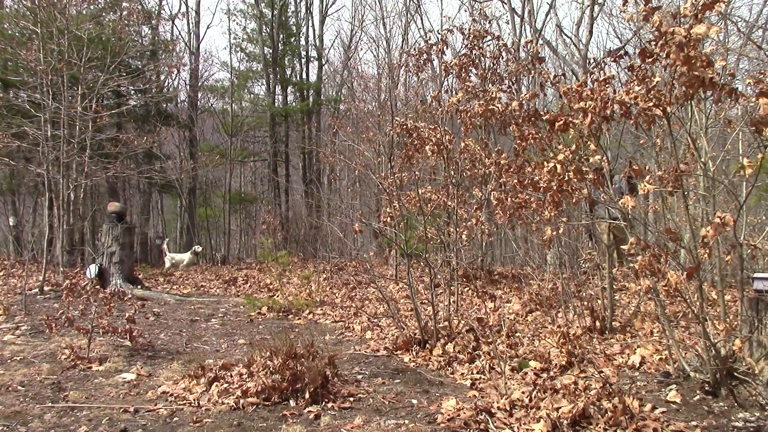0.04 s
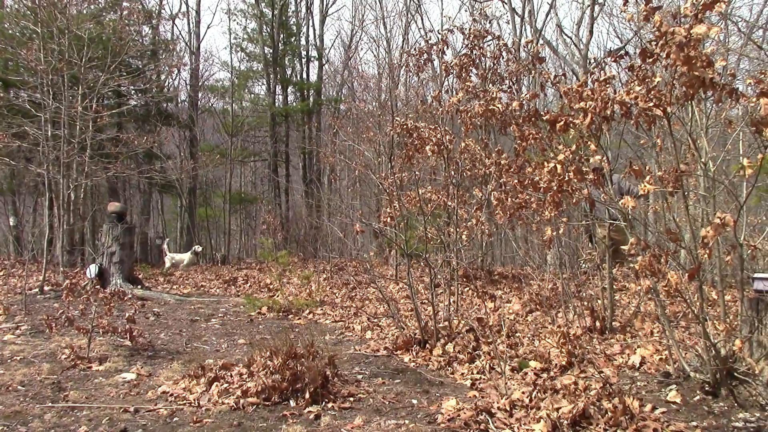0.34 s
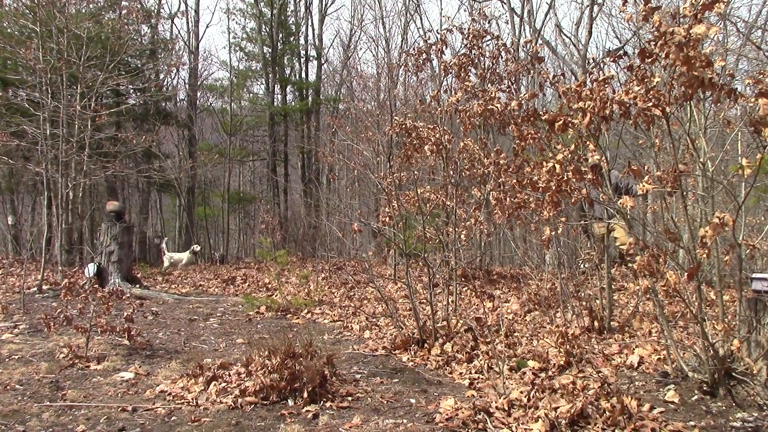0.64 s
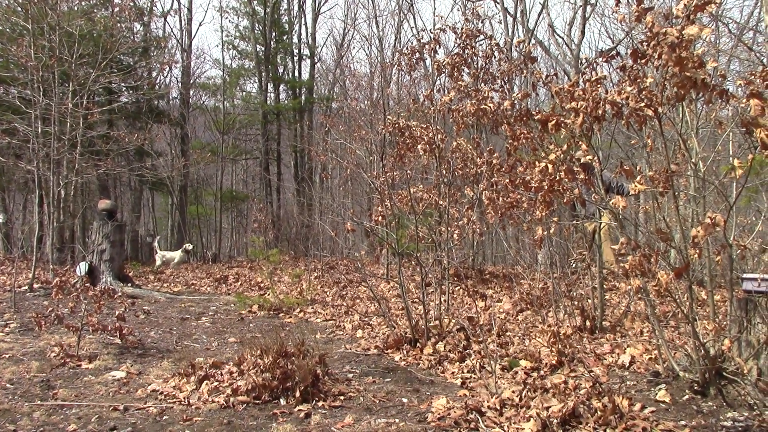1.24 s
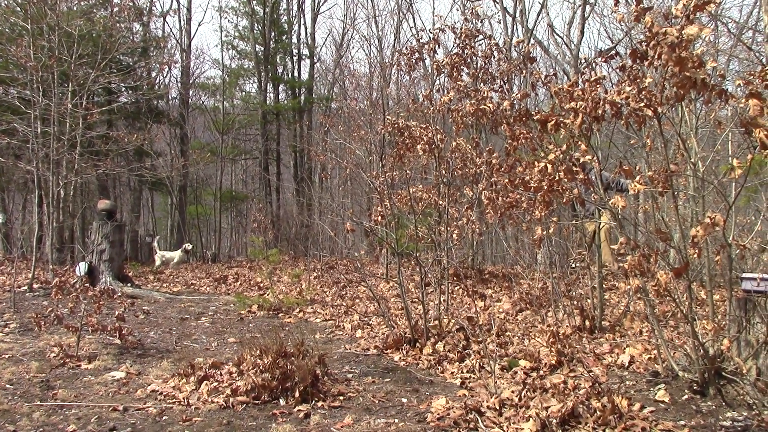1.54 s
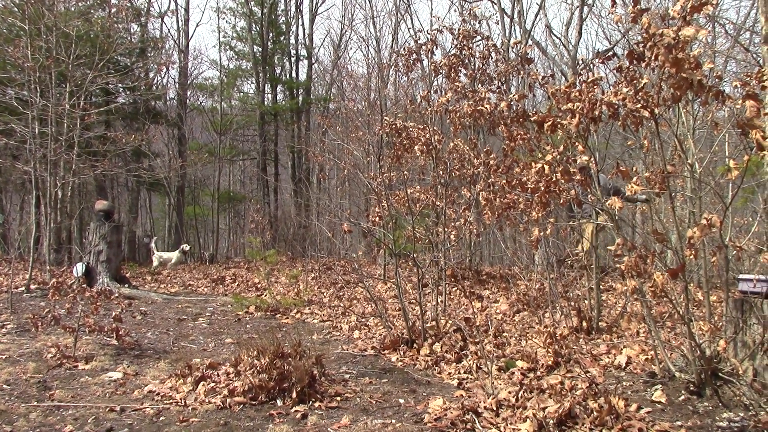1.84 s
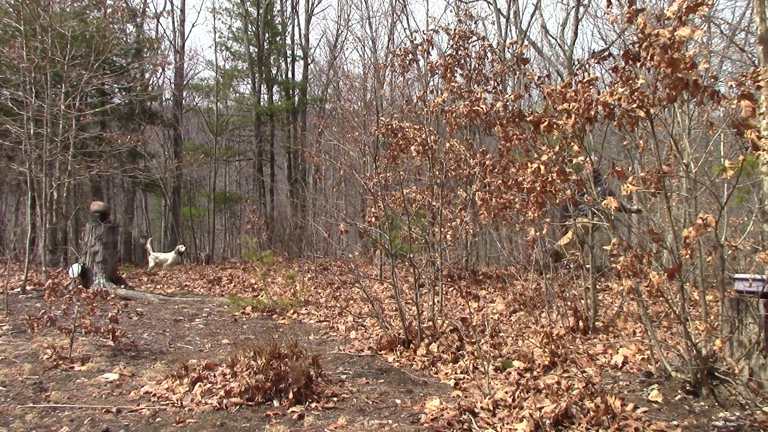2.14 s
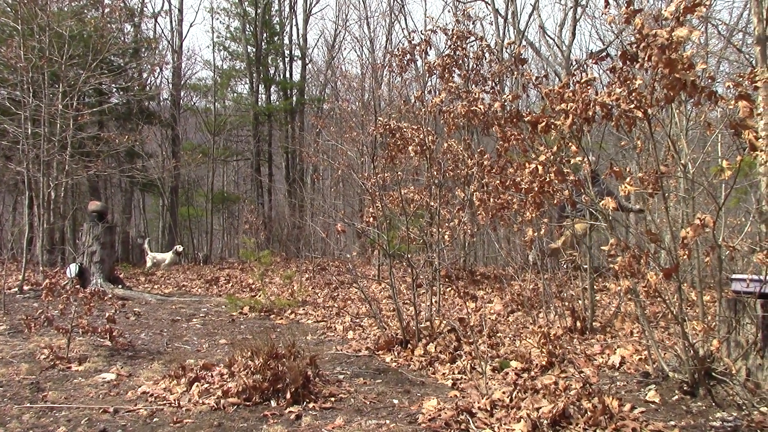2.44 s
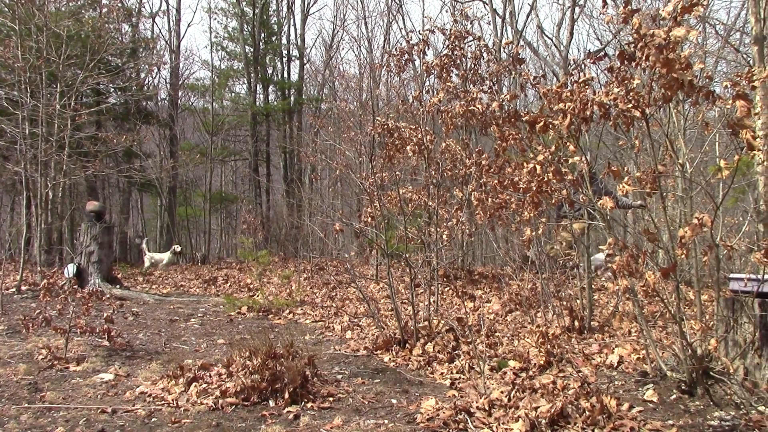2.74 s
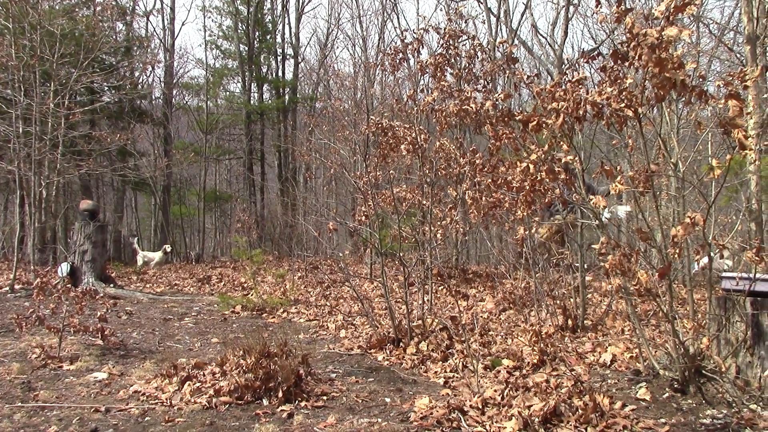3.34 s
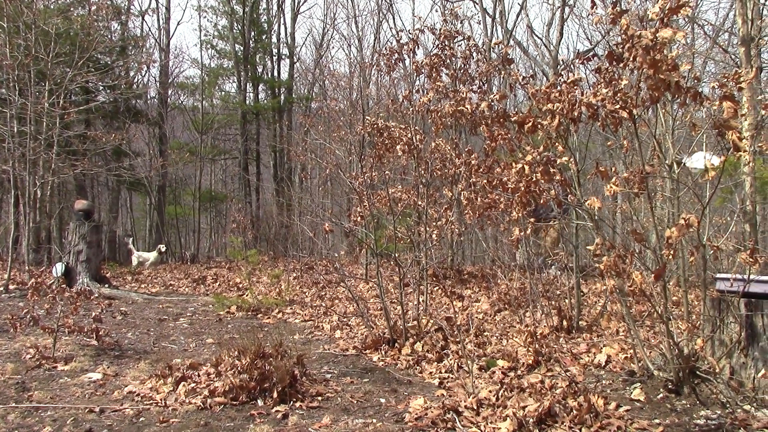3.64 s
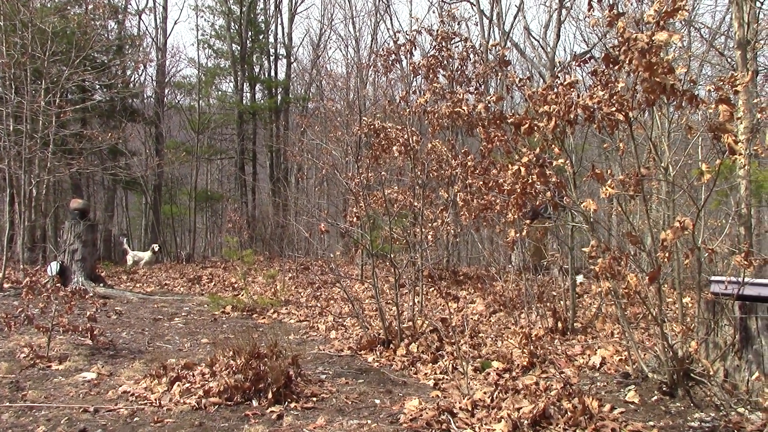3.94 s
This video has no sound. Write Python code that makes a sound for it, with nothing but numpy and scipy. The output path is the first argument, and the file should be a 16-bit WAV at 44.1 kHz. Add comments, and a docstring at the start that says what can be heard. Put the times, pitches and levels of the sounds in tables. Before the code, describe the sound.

Birds take off from dry brush at a wood's edge. Dead leaves rustle and twigs snap in light wind, then wings swish and clap rapidly, fading as the birds leave, while gusts thump the microphone.

```python
"""Birds flush from dry brush at the edge of a wood, in a light wind.
First, dead leaves scrape and fizz in swells, the odd twig snaps, and wind buffets the two mic ports.
From 2.5 s feathers swish through air and brush; then wings clap about ten times a second, each clap
a pop of trapped air and a crack of feathers, with a faint echo from the trees.
The gusts hit hardest as the birds rise, near 3.5 s, and the claps fade as they move off."""
import sys
import numpy as np
from scipy import signal
from scipy.fft import rfft, irfft
from scipy.io import wavfile
from scipy.ndimage import uniform_filter1d

SR = 44100
rng = np.random.default_rng(int(sys.argv[2]) if len(sys.argv) > 2 else 0)


def generate_wav(signal):
    """Clip the signal to [-1, 1] and save it as 16-bit WAV at the path in sys.argv[1]."""
    frames = np.transpose(np.atleast_2d(signal))
    scaled = np.clip(frames, -1, 1) * 32767
    pcm = np.round(scaled).astype(np.int16)
    wavfile.write(sys.argv[1], SR, pcm)


N = 176400
TIME = np.arange(N) / SR

# All table levels are relative: each layer is trimmed where it is mixed.
# wing claps and knocks in the brush: t/s, pop level/dB, crack level/dB, pop f/Hz, decay/ms
CLAP_CUES = [(0.748, -38, -52, 1060, .7), (0.7502, -48, -45, 1840, 2.8), (2.8534, -33, -24.5, 2020, 1.2),
             (2.86, -33, -26, 1520, 0.77), (2.9494, -25.5, -22, 1340, 1.7), (3.0479, -40, -24.5, 2250, 1.5),
             (3.1421, -21, -21, 1680, 1.5), (3.2174, -29, -24, 920, 4.7), (3.2413, -25.5, -22, 2080, 0.2),
             (3.3424, -35, -30, 1760, 0.51), (3.4166, -25.5, -27, 1430, 0.95), (3.4188, -27, -34, 2290, 2),
             (3.4205, -22.5, -33, 1640, 0.71), (3.5462, -31.5, -21.5, 1380, 0.25),
             (3.6285, -30.5, -30, 980, 0.36), (3.649, -32, -33, 1660, 1.6), (3.753, -22, -28, 870, 0.24),
             (3.8608, -33.5, -31, 1810, 4), (3.9366, -38, -34.5, 1400, 0.38), (3.9677, -39, -45, 1720, 5.4),
             (3.9891, -38.7, -34, 1510, 1.1)]
# tone of the air squeezed out and of the feathers meeting: f/Hz, level/dB
POP_EQ = [(150, 19), (600, 6.5), (1150, -2), (2200, -10), (3000, -23), (8000, -46)]
CRACK_EQ = [(800, -17), (2000, 2), (3000, 1.5), (4200, 0.5), (5300, -4), (7200, 0.5), (9300, -10),
            (11500, -10), (16000, -35)]
# wing strokes: peak t/s, rise/s, fall/s, body level/dB, hiss level/dB
SWISH_CUES = [(2.547, 0.014, 0.027, -36.5, -40.5), (2.652, 0.0047, 0.062, -39, -40),
              (2.799, 0.01, 0.011, -33, -35), (2.864, 0.0054, 0.01, -31.5, -39),
              (2.901, 0.0092, 0.0076, -35.5, -37), (2.995, .004, 0.014, -39, -41),
              (3.665, 0.0074, 0.025, -31, -61), (3.677, 0.0086, 0.0048, -35, -27),
              (3.6827, 0.0037, 0.0035, -46, -22), (3.746, 0.0017, 0.0016, -28.5, -37),
              (3.773, 0.011, 0.0047, -41, -36)]
# tone of a stroke's body and of its hiss: f/Hz, level/dB
BODY_EQ = [(150, 0), (500, -0.5), (1000, 0), (1500, 2.5), (2300, 2), (3800, -2.5), (6000, -5), (16000, -31)]
HISS_EQ = [(1500, -46), (4200, -8), (7000, 2.5), (9500, 2), (11500, -5), (13500, -13.5), (16000, -17)]
# swells of the dead leaves: t/s, mid level/dB, treble level/dB
RUSTLE_FADERS = [(0, -55, -55.5), (0.17, -48, -54), (0.37, -53.5, -60.5), (0.56, -47, -51.0),
                 (0.7, -51, -47.5), (0.8, -53, -56.5), (0.95, -54.5, -57), (1.13, -48.5, -48),
                 (1.24, -49.5, -50.1), (1.36, -54.5, -55.5), (1.58, -54, -58), (1.73, -48.5, -47.5),
                 (1.85, -44, -39), (2.08, -50.5, -45), (2.21, -45.5, -41.5), (2.4, -47.5, -45.5),
                 (2.6, -46.5, -42), (2.72, -40.5, -41), (3.0, -40.5, -40.5), (3.2, -40.5, -39),
                 (3.38, -45.5, -44.5), (3.5, -43, -41), (3.61, -42.5, -41), (3.71, -38, -38.5),
                 (3.77, -40, -43.5), (3.81, -46.5, -47), (3.89, -55, -53.5), (3.99, -46, -50)]
# tone of the leaves' dull scrape and bright fizz: f/Hz, level/dB
SCRAPE_EQ = [(200, 0.5), (500, 1), (750, -3.5), (1000, 0), (1350, 0), (1800, 2.5), (2300, -1.5),
             (3000, -.5), (3900, -2), (5200, -9.5), (8000, -13), (16000, -36)]
FIZZ_EQ = [(1500, -17), (3500, -6), (5200, -4), (7200, -1.5), (9300, -3), (11300, -8.5), (13000, -15.5),
           (15800, -24)]
# twigs and leaf stalks snapping: t/s, level/dB
SNAP_CUES = [(.216, -38.5), (0.9786, -46.5), (1.949, -37.5), (2.0068, -42), (2.022, -37.5), (2.063, -42),
             (2.885, -28.5), (3.058, -30.5), (3.0872, -32.5), (3.2015, -39), (3.234, -55)]
# ring of a twig: f/Hz, level/dB, t60/s
TWIG_MODES = [(7030, -8, 0.016), (9280, -21, 0.038)]
# wind at the mic ports: t/s, left level/dB, right level/dB
WIND_FADERS = [(0, -40, -39.5), (0.16, -46.5, -47.5), (0.24, -39, -39.5), (0.33, -48.5, -52),
               (0.44, -43, -47), (0.5, -52, -54), (0.6, -39.5, -47), (0.8, -42, -44.5), (0.92, -36.5, -42),
               (1.22, -37, -44), (1.36, -42, -49), (1.57, -44, -44), (1.72, -47.5, -54), (1.9, -42.5, -46),
               (2.0, -45.5, -49), (2.11, -38.5, -44), (2.29, -38.5, -39), (2.35, -40.5, -44),
               (2.62, -52.5, -68), (2.76, -39, -43), (3.2, -44.5, -47), (3.27, -29, -31),
               (3.35, -27.5, -26), (3.545, -23.5, -30.5), (3.583, -36, -41), (3.615, -27.5, -32),
               (3.76, -27.5, -31.5), (3.88, -39, -38.5), (3.99, -55, -55)]
# tone of the buffeting in light air and in a gust: f/Hz, level/dB
BREEZE_EQ = [(20, -44), (38, -8), (60, -4.5), (110, 4), (180, 1.5), (270, -10), (400, -17.5), (700, -23),
             (2000, -45)]
GUST_EQ = [(20, -50), (38, -33), (60, -10.5), (110, 1), (170, 1.5), (260, -1.5), (350, -8.5), (450, -17.5),
           (700, -22.5), (2000, -60)]
# single eddies thumping the ports, and near 3.75 and 3.82 s low pushes of air from the beating wings: t/s, left
# level/dB, right level/dB, f/Hz
EDDY_CUES = [(0.026, -37, -46, 179), (.061, -28, -46, 140), (0.107, -28.5, -41, 280),
             (0.449, -30, -36, 135), (0.581, -28.5, -32, 142), (.934, -21.5, -34, 260),
             (1.004, -24.5, -32, 160), (1.132, -19, -30, 190), (1.186, -21, -31, 270),
             (1.201, -16, -32, 373), (1.21, -19, -30, 195), (1.632, -24, -36, 173),
             (2.068, -28.5, -37, 153), (2.126, -29, -42, 173), (2.15, -22, -40, 185),
             (2.242, -25, -41, 159), (2.279, -22, -37, 185), (2.484, -29, -39, 150),
             (2.721, -26.5, -40, 182), (2.758, -18.5, -38, 149), (2.81, -22.5, -35, 154),
             (3.301, -32, -17.5, 196), (3.322, -17.5, -34, 220), (3.36, -20, -17, 250),
             (3.379, -11, -15.5, 240), (3.444, -15.5, -33, 205), (3.496, -5, -34, 230),
             (3.535, -11.5, -34, 260), (3.622, -14.5, -17.5, 199), (3.657, -13.5, -36, 325),
             (3.746, -14.5, -14, 170), (3.817, -22, -28, 216)]
# echo of the trees: f/Hz, t60/s
ECHO_DECAY = [(200, 1), (1500, 0.97), (6000, 0.19), (16000, 0.58)]
# low background of the wood plus microphone hiss: f/Hz, level/dB
BACKGROUND_EQ = [(30, 1), (100, 21.5), (300, -3.5), (600, -0.5), (1000, -11), (1700, -1), (4000, -22),
                 (6000, -6), (9500, -18), (16000, -39)]
# stereo width, how much the ports differ for sound from the brush: f/Hz, side level/dB
WIDTH_EQ = [(200, -3), (1300, -17), (2500, -10.5), (4300, -4.5), (6000, -1.5), (9000, -13), (16000, -1)]


def wing_claps(trim_db=-2, grit=0.38, rise_s=0.00013, longest_ring_s=0.0018, size=2048):
    """Wings meet: trapped air pops, the feathers crack and brush apart."""
    out, t = np.zeros(N), np.arange(size) / SR
    attack = np.minimum(t / rise_s, 1)
    tail = amp(-12) * np.exp(-t / 0.0038)
    for s, pop_db, crack_db, hz, decay_ms in CLAP_CUES:
        age = t * 1000 / decay_ms
        envelope = np.exp(-age) + tail
        ring = np.sin(2 * np.pi * hz * t) * np.exp(-np.maximum(age, t / longest_ring_s))
        pop = attack * (ring + grit * noise(POP_EQ, size) * envelope)
        low_cut = signal.butter(2, 0.36 * hz, "highpass", fs=SR)  # thins the pop below its pitch
        pop = signal.lfilter(*low_cut, pop)
        crack = attack * noise(CRACK_EQ, size) * envelope
        add(out, s, amp(pop_db) * unit_hit(pop) + amp(crack_db) * unit_hit(crack))
    return amp(trim_db) * out


def wing_swishes(rough_db=2.0):
    """Wings sweep through air and brush: each stroke swells and dies, roughened by single feathers."""
    body, hiss = np.zeros(N), np.zeros(N)
    for s, rise, fall, body_db, hiss_db in SWISH_CUES:
        stroke = np.exp(-np.maximum((s - TIME) / rise, (TIME - s) / fall))
        body += amp(body_db) * stroke
        hiss += amp(hiss_db) * stroke
    return (body * noise(BODY_EQ) + hiss * noise(HISS_EQ)) * amp(rough_db * wander(hz=400))


def leaves(tick_db=-9.5, flick_db=-8.5, stirred_db=-40.5, flicker_db=1.0):
    """A wash of far leaves and the ticks and flicks of near ones swell together."""
    mid_db, treble_db = curves(RUSTLE_FADERS)
    presence = amp(0.5 * (treble_db - stirred_db))  # near leaves come forward as the treble grows
    flicks, rustle = leaf_flicks(), np.zeros(N)
    for eq, level_db in (SCRAPE_EQ, mid_db + 0.5), (FIZZ_EQ, treble_db - 0.5):
        far = leaf_wash(eq)
        near = amp(tick_db) * colour(leaf_ticks(), eq) + amp(flick_db) * colour(flicks, eq)
        rustle += amp(level_db) * unit_rms(far + presence * near)
    return rustle * amp(flicker_db * wander(hz=42.3))


def leaf_ticks(per_s=1300, decay_cycles=1.6, pitches=16):
    """Dry leaf edges tick against each other, each a few cycles at its own pitch."""
    out, t = np.zeros(N), np.arange(160) / SR
    for hz in np.geomspace(1200, 13000, pitches):
        tick = unit_rms(np.sin(2 * np.pi * hz * t) * np.exp(-hz * t / decay_cycles))
        starts = triggers(per_s / pitches, spread_db=4.5, most_db=18)
        out += np.sqrt(hz) * np.convolve(starts, tick)[:N]
    return out


def leaf_flicks(per_s=60, decay_s=0.0028):
    """Leaves flick over: short dry bursts with an instant attack."""
    starts = triggers(per_s, spread_db=2, most_db=6)
    envelope = signal.lfilter([1], [1, -np.exp(-1 / (decay_s * SR))], starts)
    return envelope * rng.standard_normal(N)


def leaf_wash(eq, patch_db=1.42, size=512):
    """Clumps of leaves stir on their own, each with its own band of pitch."""
    bands = signal.stft(noise(eq), nperseg=size)[2]
    patches = uniform_filter1d(rng.standard_normal(bands.shape), size=4, axis=0)  # smear in pitch
    patches = unit_rms(uniform_filter1d(patches, size=9, axis=1))  # and in time
    return unit_rms(signal.istft(bands * amp(patch_db * patches), nperseg=size)[1][:N])


def twig_snaps(rise_s=0.00068, decay_s=0.0028, size=2048):
    """A twig breaks with a bright crack and a short ring."""
    out, t = np.zeros(N), np.arange(size) / SR
    attack = np.minimum(t / rise_s, 1)
    ring = sum(amp(db - 60 * t / t60) * np.sin(2 * np.pi * hz * t) for hz, db, t60 in TWIG_MODES)
    for s, db in SNAP_CUES:
        crack = noise(HISS_EQ, size) * np.exp(-t / decay_s)
        add(out, s, amp(db) * unit_hit(attack * (crack + ring)))
    return out


def wind(breeze_db=-39, gust_db=-36.5, shared_power=0.44, puff_db=5.0, trim_db=-0.5):
    """Turbulence comes in puffs that reach both ports, brighter than the breeze when a gust arrives."""
    shared, ports = rng.standard_normal(N), []
    puffs_db = puff_db * np.tanh(wander(hz=35))
    for level_db in curves(WIND_FADERS):
        flow = np.sqrt(shared_power) * shared + np.sqrt(1 - shared_power) * rng.standard_normal(N)
        crossfade = np.clip((level_db - breeze_db) / (gust_db - breeze_db), 0, 1)
        rumble = (1 - crossfade) * colour(flow, BREEZE_EQ) + crossfade * colour(flow, GUST_EQ)
        rumble /= np.sqrt(uniform_filter1d(rumble ** 2, 3600) + 1e-9)  # level out before the fader
        ports.append(rumble * amp(level_db + trim_db + puffs_db))
    return np.array(ports)


def eddies(width_cycles=0.67):
    """Each eddy is one short swing of pressure that reaches the right port a quarter cycle late."""
    left, right, t = np.zeros(N), np.zeros(N), np.arange(-900, 900) / SR
    for s, left_db, right_db, hz in EDDY_CUES:
        puff = np.exp(-(hz * t / width_cycles) ** 2)
        add(left, s + t[0], amp(left_db) * puff * np.cos(2 * np.pi * hz * t))
        add(right, s + t[0], amp(right_db) * puff * np.sin(2 * np.pi * hz * t))
    return np.array([left, right])


def tree_echo(x, send_db=-17):
    """Trunks scatter a faint tail back."""
    hz, t, bands = signal.stft(rng.standard_normal(SR // 2), SR, nperseg=256)
    decay = amp(-60 * t / at_hz(ECHO_DECAY, hz)[:, None])
    tail = signal.istft(bands * decay, SR, nperseg=256)[1]
    return amp(send_db) * signal.fftconvolve(x, tail / np.linalg.norm(tail))[:N]


def background(level_db=-53.5):
    """Steady low background of the wood, plus faint microphone hiss."""
    return amp(level_db) * noise(BACKGROUND_EQ)


def amp(db):
    """Decibels to gain."""
    return 10 ** (np.asarray(db) / 20)


def unit_rms(x):
    """Normalises to an rms of one."""
    return x / np.sqrt(np.mean(x ** 2) + 1e-20)


def unit_hit(x):
    """Normalises a hit to an rms of one over its first 4 ms."""
    return x / np.sqrt(np.mean(x[:176] ** 2) + 1e-20)


def at_hz(table, hz):
    """Reads a curve on a log-frequency axis."""
    f, value = np.transpose(table)
    return np.interp(np.log(hz + 1), np.log(f + 1), value)


def curves(table):
    """Fader positions at every sample."""
    s, *columns = np.transpose(table)
    return np.array([np.interp(TIME, s, c) for c in columns])


def add(mix, s, sound):
    """Drops a sound into the mix at s seconds."""
    part = mix[max(0, round(s * SR)):][:len(sound)]
    part += sound[:len(part)]


def colour(x, eq):
    """Applies an EQ curve, then normalises."""
    n = x.shape[-1]
    gain = amp(at_hz(eq, np.fft.rfftfreq(n, 1 / SR)))
    return unit_rms(irfft(rfft(x) * gain, n))


def noise(eq, size=N):
    """Noise through an EQ curve."""
    return colour(rng.standard_normal(size), eq)


def wander(hz):
    """Random modulation that rolls off above hz."""
    rolloff = 1 + (np.fft.rfftfreq(N, 1 / SR) / hz) ** 4
    return unit_rms(irfft(rfft(rng.standard_normal(N)) / rolloff, N))


def triggers(per_s, spread_db, most_db):
    """Impulses at random times, a few much louder than the rest."""
    fired = rng.random(N) < per_s / SR
    return fired * amp(np.minimum(spread_db * rng.exponential(1, N), most_db))


def scene(side_db=-13, right_db=0.5):
    """Birds and brush sit in the centre with a little width; the wind is right on the mic."""
    hits = wing_claps() + twig_snaps()
    centre = hits + tree_echo(hits) + wing_swishes() + leaves() + background()
    width = amp(side_db + at_hz(WIDTH_EQ, np.fft.rfftfreq(N, 1 / SR)))
    side = irfft(1j * rfft(centre) * width, N)  # a quarter cycle out of phase
    return np.array([centre - side, (centre + side) * amp(right_db)]) + wind() + eddies()


def record(dry, low_cut_hz=53, high_cut_hz=15900):
    """The recorder's low cut and band limit."""
    low_cut = signal.butter(3, low_cut_hz, "highpass", fs=SR, output="sos")
    high_cut = signal.firwin(511, high_cut_hz, window=("kaiser", 9), fs=SR)
    return signal.oaconvolve(signal.sosfilt(low_cut, dry), high_cut[None], "same")


dry = scene()
out = record(dry)
generate_wav(out)
```